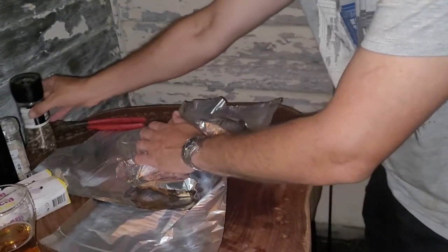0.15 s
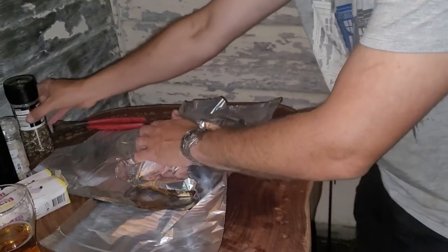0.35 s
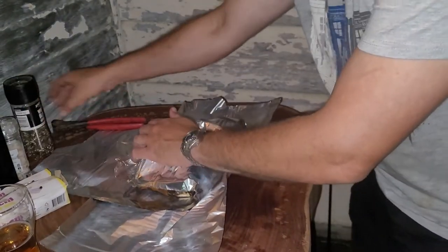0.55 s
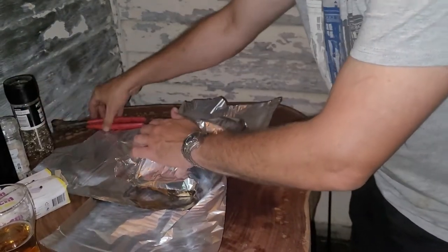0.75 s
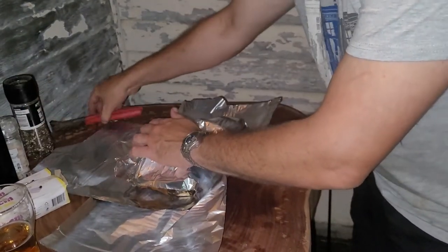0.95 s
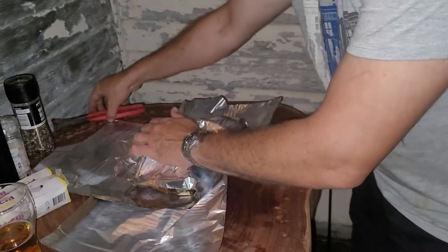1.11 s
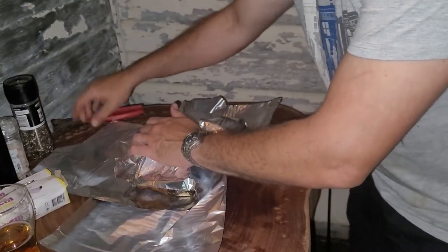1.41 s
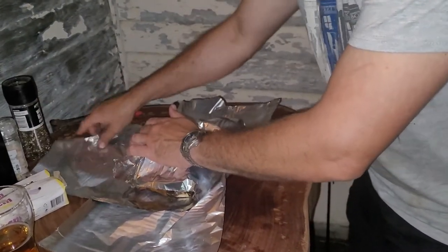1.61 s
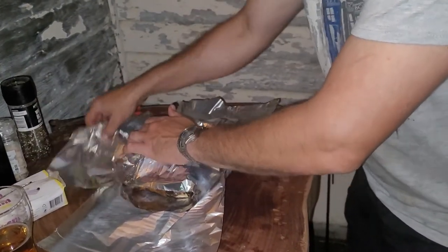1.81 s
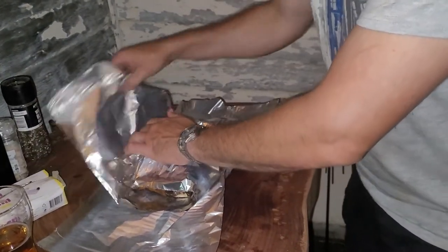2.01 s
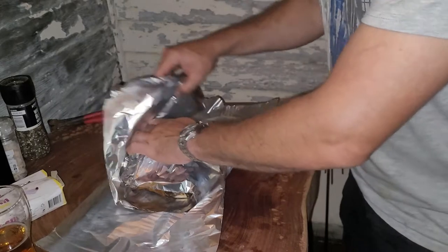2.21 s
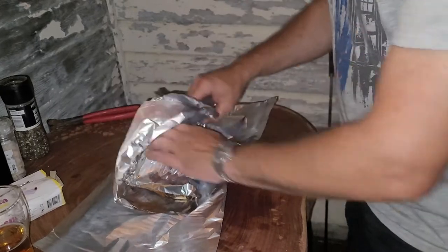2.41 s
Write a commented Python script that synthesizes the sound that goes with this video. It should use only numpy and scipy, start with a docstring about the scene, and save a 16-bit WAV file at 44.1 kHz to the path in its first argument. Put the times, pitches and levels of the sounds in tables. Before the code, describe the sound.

Aluminium foil ticks and stirs faintly under a hand in a quiet outdoor corner. A grinder is set down softly on wood at 0.2 seconds and scuffs briefly. Metal tongs knock on the table at 1.1 seconds and again, with clicks, at 1.4. From 1.6 seconds to the end at about 2.5, the foil is folded in a dense, bright crackle, while light wind buffets the microphone's right side.

```python
"""A sheltered corner outdoors: aluminium foil is folded over a joint of meat on a wooden table.
Creases buckle and tick under a resting hand while the other hand sets down a grinder and knocks the tongs
on the table, exciting damped modes. Then the sheet is lifted and bent over, and thousands of buckling
impulses merge into a dense bright crackle. Air buffets the right side of the microphone."""
import sys
import numpy as np
from scipy import signal
from scipy.fft import rfft, irfft, next_fast_len
from scipy.io import wavfile

SR = 44100
rng = np.random.default_rng(int(sys.argv[2]) if len(sys.argv) > 2 else 0)


def digitize_waveform(pressure):
    """Quantize a signal to 16-bit integers and store it at the path in sys.argv[1].

    Rows of a 2-D input are taken as channels; values are limited to [-1, 1].
    """
    field = np.atleast_2d(pressure).T
    bounded = np.clip(field, -1, 1)
    quanta = np.round(bounded * 32767).astype(np.int16)
    wavfile.write(sys.argv[1], SR, quanta)


N = 112454
TIME = np.arange(N) / SR


def from_db(db):
    """Amplitude ratio of a level in decibels."""
    return 10 ** (np.asarray(db) / 20)

def unit_rms(x):
    """Normalisation to unit power."""
    return x / np.sqrt(np.mean(x ** 2) + 1e-20)

def envelope(rows):
    """Gain interpolated in decibels, silent before its first point."""
    return from_db(np.interp(TIME, *np.transpose(rows), left=-120))

def decay(start_s, t60_s):
    """Exponential decay from a sudden onset."""
    return (TIME >= start_s) * np.exp(-np.log(1000) * np.maximum(TIME - start_s, 0) / t60_s)

def butterworth(x, hz, kind):
    """Causal fourth-order low-pass or high-pass."""
    return signal.sosfilt(signal.butter(4, min(hz, SR / 3), kind, fs=SR, output="sos"), x + 1e-18)

def colour(x, spectrum):
    """Spectral shaping by a smooth curve, at unit rms."""
    hz, db = np.transpose(spectrum)
    size = 2 * next_fast_len(N // 2 + SR // 20)
    bins_hz = np.maximum(np.fft.rfftfreq(size, 1 / SR), 1)
    gain = from_db(np.interp(np.log(bins_hz), np.log(hz), db))
    return unit_rms(irfft(rfft(x, size) * gain)[..., :N])

def pan(x, left_db):
    """Level difference between the channels."""
    return x * from_db([[left_db / 2], [-left_db / 2]])

def from_left(x, lag_s):
    """Path difference: sound from the left reaches the right channel later."""
    return np.array([x[0], np.interp(TIME - lag_s, TIME, x[1])])

def correlate(x, coherence):
    """Mid-side mixing gives two independent channels a set coherence."""
    return np.sqrt((1 + coherence) / 2) * x[0] + np.sqrt((1 - coherence) / 2) * x[1] * [[1], [-1]]

def noise(spectrum, coherence=0):
    """Coloured Gaussian noise in stereo, at unit rms."""
    return colour(correlate(rng.standard_normal((2, N)), coherence), spectrum)

def sway(depth_db, bandwidth_hz):
    """Random amplitude modulation."""
    return from_db(depth_db * unit_rms(butterworth(rng.standard_normal(N), bandwidth_hz, "low")))

def bursts(rows, spectrum):
    """Transients: high-passed noise with a very fast exponential decay."""
    hiss = noise(spectrum)
    out = 0
    for start_s, level_db, decay_s, highpass_hz in rows:
        fade = (TIME >= start_s) * np.exp(-np.abs(TIME - start_s) / decay_s)
        out = out + butterworth(hiss * from_db(level_db) * fade, highpass_hz, "high")
    return out

def corner(x, t60_s=0.14, wet_db=-2):
    """Reverberation: direct sound plus diffuse reflections from table and walls."""
    response = (rng.standard_normal((2, N)) * decay(0, t60_s))[:, :SR // 4]
    response /= np.sqrt(np.sum(response ** 2, axis=1, keepdims=True))
    wet = from_db(wet_db)
    return (x + wet * signal.fftconvolve(x, response, axes=1)[:, :N]) / np.hypot(1, wet)


# Spectra of the outdoor floor and a far hiss: frequency_hz, density_db (all table levels are relative)
FLOOR_SPECTRUM = [(20,16),(60,-18),(150,-8),(350,1),(700,-12),(1400,-17.5),(2600,-43.5),(5000,-35),(15500,-44.5)]
FAR_HISS_SPECTRUM = [(2000,-82),(2800,11),(3250,27),(3900,26.5),(4400,13),(6000,-70)]

def background():
    """Stationary ambient noise: a quiet floor and a narrow band of far hiss."""
    return noise(FLOOR_SPECTRUM, coherence=0.65) * from_db(-67) + noise(FAR_HISS_SPECTRUM) * from_db(-69.5)

# Spectrum of the buffeting: frequency_hz, density_db
AIR_SPECTRUM = [(15,-33),(35,-9),(58,2.5),(85,-8),(130,-13.5),(200,-30.5),(400,-33),(1500,-95)]
# Strength of the buffeting: time_s, level_db
AIR_LEVEL = [(0,-100),(.3,-71),(.39,-61),(.48,-67.5),(.64,-55),(.88,-50.5),(1.0,-72),(1.12,-47.5),(1.27,-52.5),(1.33,-59.5),(1.38,-41.5),(1.5,-50),(1.57,-56),(1.7,-52.5),(1.75,-41.5),(1.84,-51.5),(1.9,-37.5),(2.0,-41.5),(2.3,-44),(2.55,-49)]
# Single puffs: centre_s, level_db, pitch_hz
AIR_PUFFS = [(0.617,-40,70),(0.754,-39.5,109),(1.729,-32.5,101),(1.925,-23.5,72),(2.335,-31,132),(.968,-51.5,148)]

def air(puff_cycles=0.63, left_db=-22.5):
    """Turbulent pressure on the microphone: low rumble and puffs, mostly on the right."""
    puffs = 0
    for centre_s, level_db, pitch_hz in AIR_PUFFS:
        cycles = (centre_s - TIME) * pitch_hz
        puffs += from_db(level_db) * np.sin(2 * np.pi * cycles) * np.exp(-(cycles / puff_cycles) ** 2)
    rumble = noise(AIR_SPECTRUM) * envelope(AIR_LEVEL) * from_db(4.0)
    return (rumble + puffs) * from_db([[left_db], [0]])

# Spectrum of scuffed wood: frequency_hz, density_db
SCRAPE_SPECTRUM = [(400,-31),(900,-7),(1400,1.5),(1800,-4.5),(2300,-13),(3500,-6),(8000,-34)]

def grinder_slide(centre_s=0.429, width_s=0.07, level_db=-58):
    """Sliding friction: the grinder scuffs briefly over the wood."""
    return noise(SCRAPE_SPECTRUM) * from_db(level_db) * np.exp(-((TIME - centre_s) / width_s) ** 2)

# Glide of the squeak: time_s, pitch_hz
SQUEAK_GLIDE = [(1.344,4600),(1.4,3800)]

def tongs_squeak(level_db=-63.5, roughness_hz=240):
    """Friction of the slipping tongs: a noise-modulated tone swells and falls in pitch."""
    time_s, pitch_hz = np.transpose(SQUEAK_GLIDE)
    roughness = unit_rms(butterworth(rng.standard_normal((2, N)), roughness_hz, "low"))
    swell = np.exp(-(2 * (TIME - time_s.mean()) / np.ptp(time_s)) ** 4)
    phase = 2 * np.pi * np.cumsum(np.interp(TIME, time_s, pitch_hz)) / SR
    return from_db(level_db) * roughness * swell * np.sin(phase)

# Clicks of the metal arms: start_s, level_db, decay_s, highpass_hz
TONGS_CLICKS = [(1.4038,-31,0.003,3800),(1.4574,-43,0.0038,4000),(1.4666,-42,0.0051,900)]
# Spectrum of a click: frequency_hz, density_db
CLICK_SPECTRUM = [(900,4),(3000,-3),(4400,3),(5500,0),(7000,3),(9500,-5.5),(12000,-6),(15500,-1.5)]

def tongs_clicks(wash_db=-3):
    """Brief metal contacts radiate broadband clicks, with a little wash from the walls."""
    clicks = bursts(TONGS_CLICKS, CLICK_SPECTRUM)
    return pan(clicks + from_db(wash_db) * corner(clicks), left_db=3.5) * from_db(-5.5)

def knocks(rows, modes, spectrum, hand_damping=1.08, clatter_t60_s=0.16, rebound_s=0.01, rebound_db=-17):
    """Impact excitation: modes ring, damped by a holding hand, over a clatter that rebounds once."""
    out = 0
    for start_s, ring_db, clatter_db, lowpass_hz in rows:
        ring = 0
        for k, (pitch_hz, level_db, free_t60_s) in enumerate(modes):
            tone = (-1) ** k * np.sin(2 * np.pi * pitch_hz * (TIME - start_s))
            ring += from_db(level_db) * decay(start_s, free_t60_s / hand_damping) * tone
        rebound = from_db(rebound_db) * decay(start_s + rebound_s, clatter_t60_s / 2)
        clatter = (decay(start_s, clatter_t60_s) + rebound) * noise(spectrum, coherence=0.64)
        knock = from_db(ring_db) * ring + from_db(clatter_db) * clatter
        out = out + butterworth(knock, lowpass_hz, "low")
    return pan(out, left_db=-0.5)

# Impacts on the table: start_s, ring_db, clatter_db, lowpass_hz
WOOD_IMPACTS = [(.2065,-46.5,-47,417),(1.393,-58,-42.5,910),(1.403,-36,-30.5,1210)]
# Modes of the table: pitch_hz, level_db, free_t60_s
WOOD_MODES = [(73, -10, 0.21), (128.7, 2, 0.27), (225, 3, 0.21), (387, -14, 0.33), (580, -1, 0.05),
              (773, -3, 0.059), (997, -5.5, 0.075)]
# Spectrum of its clatter: frequency_hz, density_db
WOOD_SPECTRUM = [(60,-11),(200,5),(450,11),(700,-2.5),(1000,-5.5),(1300,-16),(2000,-47),(5000,-65)]

def table_knocks():
    """Damped modal vibration of the struck wooden table."""
    return from_left(knocks(WOOD_IMPACTS, WOOD_MODES, WOOD_SPECTRUM), lag_s=0.00015)

# Impact of the tongs: start_s, ring_db, clatter_db, lowpass_hz
METAL_IMPACTS = [(1.1305,-27,-21.5,1740)]
# Modes of the tongs: pitch_hz, level_db, free_t60_s
METAL_MODES = [(152.5, -16, 0.34), (311, -1.5, 0.063), (349, -5, 0.24), (422, -18.5, 0.43),
               (634, -34, 0.66), (697, -23, 0.39), (683, -19, 0.18), (964, -29, 0.44), (1120, -34, 0.1),
               (1340, -33, 0.078), (1560, -26, 0.096), (1940, -42, 0.14)]
# Spectrum of their clatter: frequency_hz, density_db
METAL_SPECTRUM = [(80,-11),(200,3.5),(330,9),(550,2.5),(850,-6),(1200,-8.5),(1600,-18),(2200,-21),(5000,-65)]

def tongs_knock():
    """Damped modal vibration of the tongs as they strike the table."""
    return from_left(knocks(METAL_IMPACTS, METAL_MODES, METAL_SPECTRUM), lag_s=0.00022)

def crackle(per_s, spectrum, t60_s, coherence=0, unevenness=1, facets=5):
    """Snap-through buckling: creases flip at random on facets of differing colour, each ringing briefly."""
    size_spread_db, ripple_db = 2.5, 9.5
    ripple_hz = np.geomspace(500, SR / 2, 28)
    clusters = sway(unevenness * 0.12, bandwidth_hz=37.8)
    energy_kept = from_db(-60 / (t60_s * SR)) ** 2  # per sample
    out = 0
    for k in range(facets):
        sizes = from_db(size_spread_db * np.minimum(rng.exponential(1, N), 4))
        flips = sizes * (rng.random(N) < per_s / facets / SR)
        energy = signal.lfilter([1], [1, -energy_kept], flips ** 2 + 1e-18)
        rings = np.sqrt(energy) * rng.standard_normal((2, N))
        tint_db = ripple_db * np.sin(np.arange(len(ripple_hz)) * np.pi / 2 + 2 * np.pi * k / facets)
        facet = colour(rings, np.transpose([ripple_hz, tint_db]))
        out = out + facet * sway(unevenness * 1.5, bandwidth_hz=14.8)  # swells and fades with bending
    return colour(correlate(corner(out * clusters), coherence), spectrum)

# Single creases giving way, plus two quick bounces of the tongs at 1.135 and 1.142 s: start_s, level_db,
# decay_s, highpass_hz
CREASE_SNAPS = [(0.0664,-49,0.0044,1500),(0.1728,-38,0.0078,3780),(0.2665,-45,0.0021,2500),(0.286,-43.5,0.012,800),(0.3447,-44,0.0034,1000),(0.481,-50,.005,1500),(0.51,-53,0.0055,2500),(0.557,-50.5,0.0022,2380),(.6165,-50,0.01,4050),(0.7277,-49.5,0.0044,3800),(0.7554,-47,0.0056,2500),(0.798,-60.5,0.036,3450),(0.8545,-55,0.038,4000),(0.88,-52.5,0.02,2500),(0.904,-52,0.016,1980),(1.135,-47,0.014,3020),(1.142,-47,0.015,3200),(1.254,-55,0.0046,2000)]
# Spectra of the snaps and the stirring foil: frequency_hz, density_db
SNAP_SPECTRUM = [(300,-13),(1500,1.5),(3000,3.5),(5000,0.5),(7000,2.5),(9500,2),(12000,4),(15500,0.5)]
STIR_SPECTRUM = [(150,-0.5),(500,-8),(1000,1),(2200,4),(3500,-1),(5500,1),(9000,-4),(12000,-1),(15500,-3.5)]
# Strength of the stirring: time_s, level_db
STIR_LEVEL = [(0,-54.5),(.035,-65),(.12,-64),(.14,-54),(.2,-62),(.27,-59),(.3,-57),(.335,-62),(.37,-56.5),(.5,-65.5),(.58,-69),(.7,-75),(.79,-67),(.84,-71),(.87,-67),(.915,-62.5),(.98,-77),(1.12,-74.5),(1.17,-72),(1.23,-65),(1.35,-72.5),(1.45,-64),(1.55,-73)]

def resting_hand(extra_direct=0.46):
    """Buckling under a light load: the foil stirs faintly and single creases snap, close by and drier; the same
    bursts carry two quick bounces of the tongs."""
    snaps = bursts(CREASE_SNAPS, SNAP_SPECTRUM)
    stir = crackle(per_s=950, spectrum=STIR_SPECTRUM, t60_s=0.02) * envelope(STIR_LEVEL) * from_db(2.5)
    return pan((extra_direct * snaps + corner(snaps)) * from_db(-1) + stir, left_db=2.0)

# Spectrum of the hollow rattle: frequency_hz, density_db
RATTLE_SPECTRUM = [(120,-32),(200,-6.5),(255,-0.5),(320,2),(440,-7.5),(550,-10),(680,-7),(900,-9),(1600,-15.5)]
# Strength of the rattle: time_s, level_db
RATTLE_LEVEL = [(1.56,-62),(1.66,-56),(1.70,-56),(1.75,-65.5),(1.9,-60.5),(1.96,-54),(2.015,-50.5),(2.065,-39.5),(2.14,-46),(2.2,-52),(2.33,-47),(2.45,-43),(2.55,-49)]

def hollow_rattle():
    """Low-frequency vibration of whole panels, largely coherent between the channels."""
    rattle = crackle(per_s=700, spectrum=RATTLE_SPECTRUM, t60_s=0.032, coherence=0.62, unevenness=0.18)
    return butterworth(pan(rattle, left_db=-1.5) * envelope(RATTLE_LEVEL) * from_db(4.0), 228, "high")

# Spectrum of the flexing sheet: frequency_hz, density_db
FLEX_SPECTRUM = [(400,-14.5),(800,-9),(1300,-1),(1650,-5),(2200,0),(3000,-3.5),(4200,-5),(7000,-11),(15000,-15.5)]
# Strength of the flexing: time_s, level_db
FLEX_LEVEL = [(1.56, -76), (1.568, -61), (1.62, -61), (1.652, -52), (1.768, -51.5), (1.824, -43),
              (1.89, -51), (2.026, -46), (2.04, -41), (2.168, -43), (2.178, -47), (2.358, -40.5),
              (2.516, -43.5), (2.55, -45.5)]

def sheet_flex():
    """Flexure of the whole sheet radiates a mid-range crackle."""
    flex = crackle(per_s=810, spectrum=FLEX_SPECTRUM, t60_s=0.028)
    return pan(flex, left_db=1.5) * envelope(FLEX_LEVEL) * from_db(4.5)

# Spectrum of the fine creases: frequency_hz, density_db
CREASE_SPECTRUM = [(300,-32),(1500,-32),(2900,-13),(4000,-10),(5400,-5.5),(7000,-6),(9500,-5.5),(12000,-1),(13500,-3.5),(15500,-1.5)]
# Strength of the creasing: time_s, level_db
CREASE_LEVEL = [(1.554, -70), (1.562, -39.5), (1.576, -34), (1.606, -38), (1.65, -29.5), (1.716, -38),
                (1.836, -33.5), (1.88, -37.5), (1.9, -36), (1.932, -43.5), (1.954, -32), (1.972, -39),
                (2.024, -35.5), (2.038, -31.5), (2.08, -28), (2.128, -35.5), (2.148, -33.5), (2.21, -39),
                (2.22, -32.5), (2.232, -37.5), (2.45, -33.5), (2.53, -38.5), (2.55, -43)]

def bright_creases(pops_db=-9):
    """Superposed buckling impulses: fine creases merge while sparser, larger ones pop out."""
    fine = crackle(per_s=3200, spectrum=CREASE_SPECTRUM, t60_s=0.042)
    pops = crackle(per_s=110, spectrum=CREASE_SPECTRUM, t60_s=0.02)
    return pan(fine + from_db(pops_db) * pops, left_db=1.5) * envelope(CREASE_LEVEL) * from_db(4.0)

# Echo path off the bending sheet: time_s, delay_s
ECHO_PATH = [(1.55,0.00039),(1.85,0.00093),(2.1,.0016),(2.55,0.00078)]

def sheet_reflection(x, echo_db=-14.5):
    """Comb filtering: the curved sheet reflects its own sound, and the changing path sweeps the colour."""
    emitted_s = TIME - np.interp(TIME, *np.transpose(ECHO_PATH))
    echo = np.array([np.interp(emitted_s, TIME, side) for side in x])
    gain = from_db(echo_db)
    return (x + gain * echo) / np.hypot(1, gain)

def fold():
    """Bending of a thin sheet: fine creases buckle first, then whole panels flex and rattle."""
    return sheet_reflection(bright_creases() + sheet_flex()) + hollow_rattle()

def scene():
    """Linear superposition of all sources at the microphone."""
    impacts = tongs_knock() + table_knocks()
    foil = fold() + resting_hand()
    return impacts + foil + tongs_clicks() + grinder_slide() + tongs_squeak() + air() + background()

def record(dry, cutoff_hz=15850):
    """Band limiting by a steep elliptic low-pass."""
    return signal.sosfilt(signal.ellip(12, .2, 70, cutoff_hz, fs=SR, output="sos"), dry)


dry = scene()
out = record(dry)
digitize_waveform(out)
```